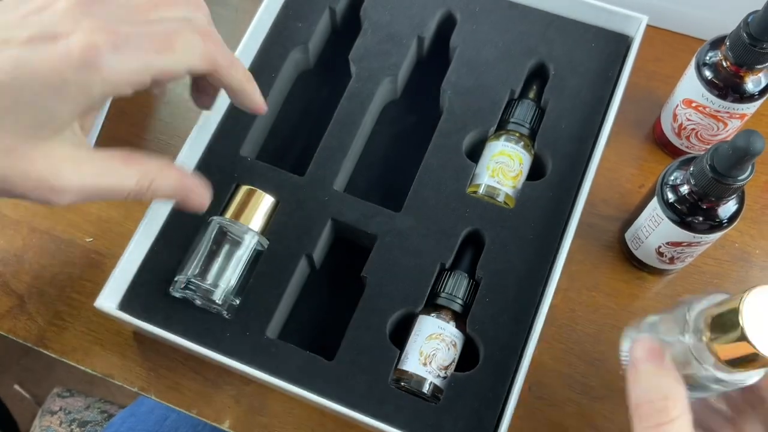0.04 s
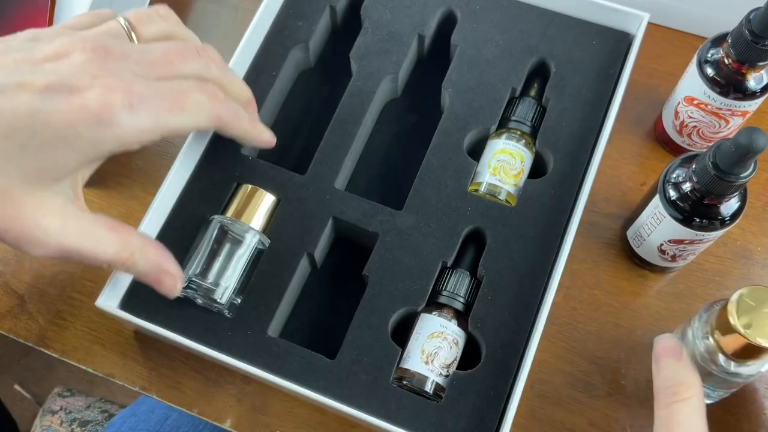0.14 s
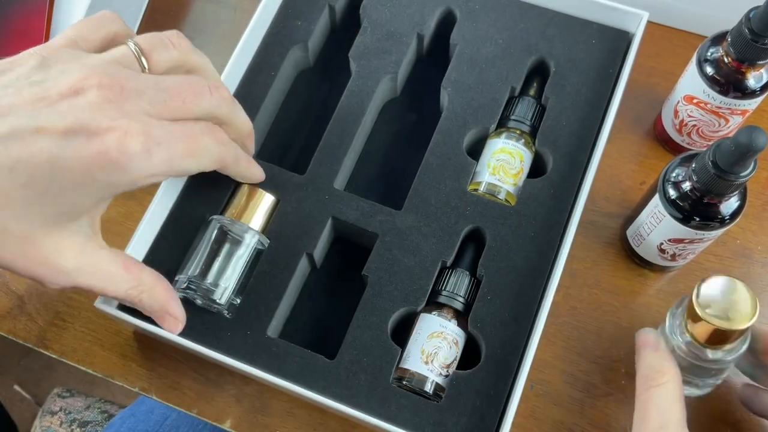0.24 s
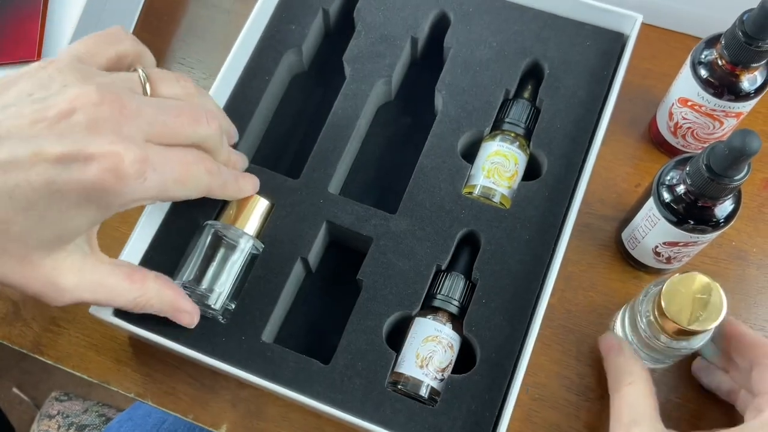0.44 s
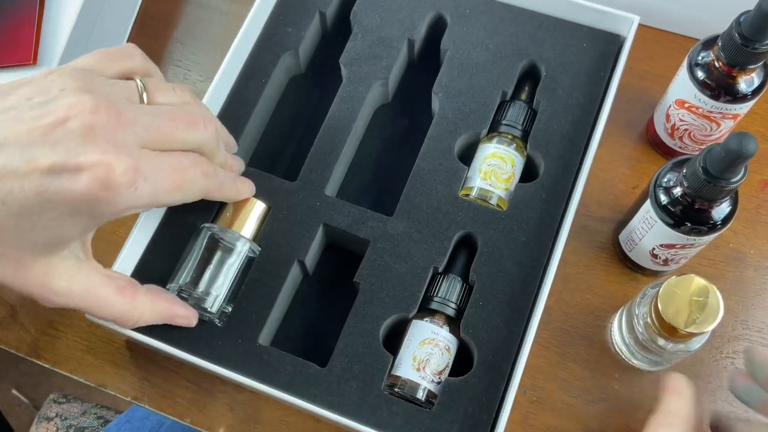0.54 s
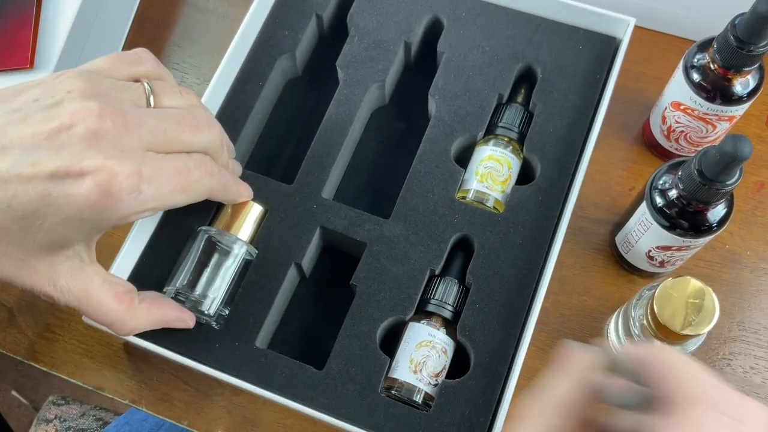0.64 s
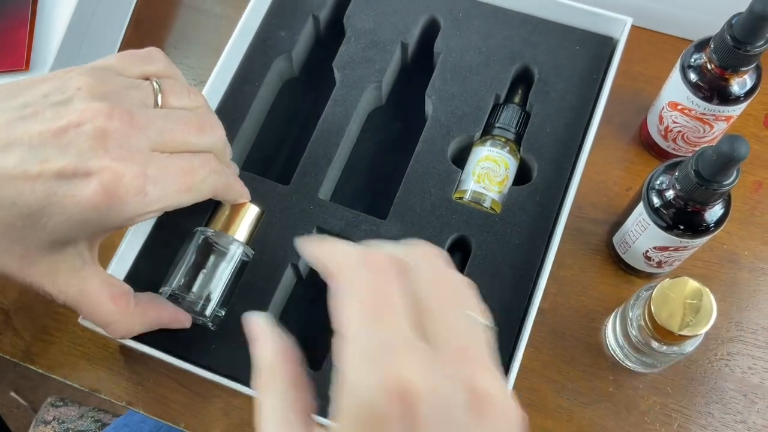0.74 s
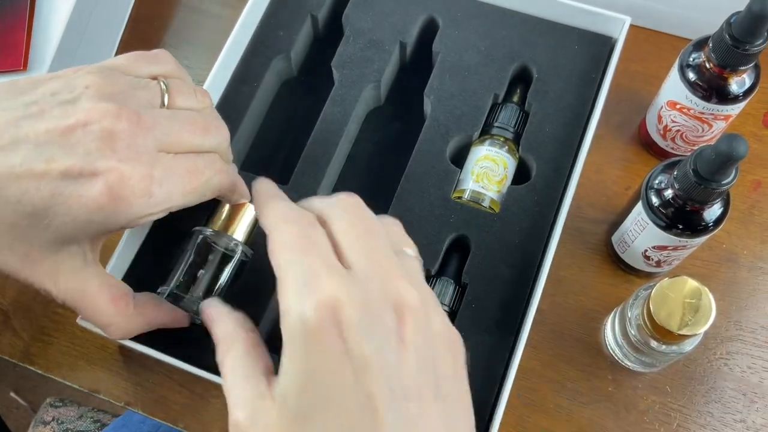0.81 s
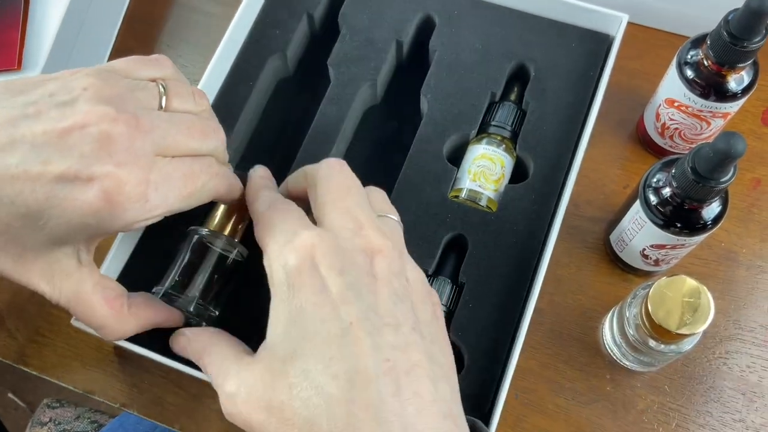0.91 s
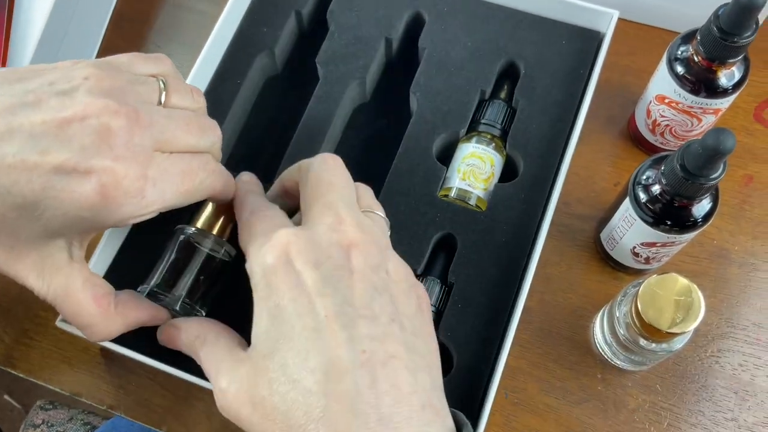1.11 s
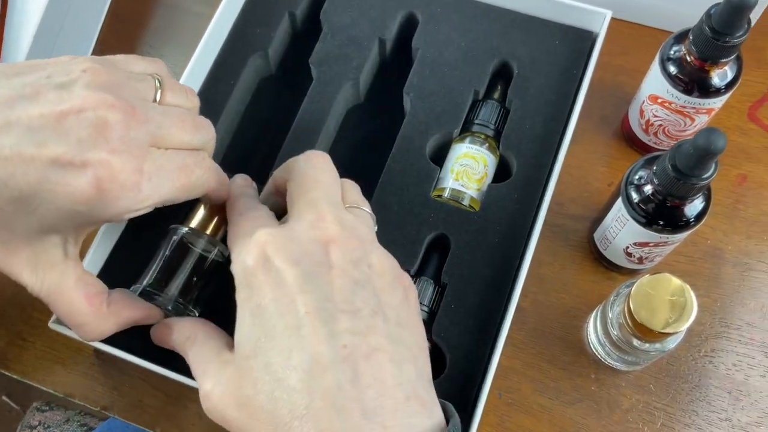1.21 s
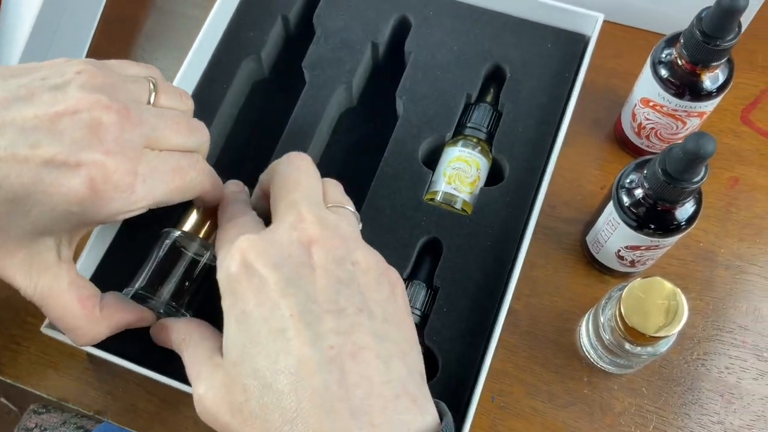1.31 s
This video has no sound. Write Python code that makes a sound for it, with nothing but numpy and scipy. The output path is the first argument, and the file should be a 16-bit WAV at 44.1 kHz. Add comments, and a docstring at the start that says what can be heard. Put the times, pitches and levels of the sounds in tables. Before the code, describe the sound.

A small glass bottle is stood on a wooden table: a faint tick at 0.15 s, a strong, woody knock at 0.23, then a flatter drop and tiny rocking at 0.35-0.38, with damped glass clicks and short room ring. Faint sliding follows until 0.55. From 0.85 to 1.25, quiet rubbing, foam friction and finger ticks, with a dull box bump near 1.12. Low room rumble, close stereo microphones.

```python
"""A quiet room: a small glass bottle is stood on a wooden table; one edge knocks down, then the base drops
flat and rocks. Filtered impulses ring table modes, dense wood, glass and the room.
The glass slides a little under the fingers; then the hands rub and tick against another bottle in its
foam tray, all made of shaped noise, with faint ringing of the box under the ticks.
A low room rumble of coloured noise lies underneath, heard by a close pair of microphones."""
import sys
import numpy as np
from scipy import signal
from scipy.fft import rfft, irfft
from scipy.io import wavfile

SR = 44100
rng = np.random.default_rng(int(sys.argv[2]) if len(sys.argv) > 2 else 0)


def put_to_file(sound):
    """Save the sound as 16-bit audio at rate SR, in the file named by the first command-line argument."""
    columns = np.atleast_2d(sound).T  # one column per channel
    safe = np.clip(columns, -1, 1)
    whole_steps = np.round(safe * 32767)
    wavfile.write(sys.argv[1], SR, whole_steps.astype(np.int16))


N = 59535
TIME = np.arange(N) / SR  # seconds
BINS = np.fft.rfftfreq(2 * N, 1 / SR)  # Hz, for spectra padded to twice the length
ROOM_T60_S, ROOM_RISE_S = 0.46, 0.0024


def from_db(db):
    """Decibels to gain."""
    return 10 ** (np.asarray(db) / 20)


def at_bins(points):
    """Spread a table over frequency, joined by straight lines on a log axis."""
    hz, value = np.transpose(points)
    return np.interp(np.log(BINS + 1), np.log(hz), value)


def noise(spectrum):
    """Coloured stereo noise of rms 1, its sides sharing as much as a close microphone pair would hear."""
    # Likeness of left and right. Each row: frequency in Hz, correlation (1 is identical).
    likeness = [(60, 1), (130, 0.99), (400, 0.36), (700, -0.02), (1000, 0.3), (1500, 0.7), (2400, 0.45),
                (3500, 0.8), (15000, 0.9)]
    mid, side = rfft(rng.standard_normal((2, 2 * N)))
    alike = np.clip(at_bins(likeness), 0, 1)
    pair = np.sqrt(1 + alike) * mid + np.sqrt(1 - alike) * side * [[1], [-1]]
    x = irfft(pair * from_db(at_bins(spectrum)))[:, :N]
    return x / x.std()


def tail(spectrum, t60, rise_s):
    """A dense response: coloured noise that swells and dies away, at unit energy."""
    decay = from_db(-60 * TIME / t60)
    swell = 1 - np.exp(-TIME / rise_s)
    x = noise(spectrum) * decay * swell
    return x / np.sqrt(np.sum(x ** 2) / 2)  # mean energy of the two sides


def through(x, response):
    """Play a mono signal through a mono or stereo response by convolution."""
    return signal.fftconvolve(x[None], np.atleast_2d(response), axes=1)[:, :N]


def ringing(modes, alternate=True):
    """Impulse response of a body: decaying sines, of alternating sign or all in step."""
    response = 0
    for k, (hz, db, t60) in enumerate(modes):
        sign = -1 if alternate and k % 2 else 1
        decay = from_db(db - 60 * TIME / t60)
        response = response + sign * decay * np.sin(2 * np.pi * hz * TIME)
    return response


def click(s, db):
    """One impulse, the shortest possible blow."""
    x = np.zeros(N)
    x[int(s * SR)] = from_db(db)
    return x


def cut(x, hz, kind, order):
    """Butterworth low- or high-pass."""
    sos = signal.butter(order, hz, kind, fs=SR, output="sos")
    return signal.sosfilt(sos, x + 1e-18)  # the tiny offset keeps the filter clear of denormal numbers


def friction(spectrum):
    """Rubbing noise, made grainy by tiny sticks and slips that wander its level."""
    grain_db, grains_per_s = 1, 340
    slips = np.interp(TIME * grains_per_s, np.arange(N), rng.standard_normal(N))
    return noise(spectrum) * from_db(grain_db * slips)


def strokes(rows, spectrum):
    """Friction under strokes that rise in a straight line, hold and let go exponentially."""
    attack_s, release_s = 0.0093, 0.013
    level = 0
    for s, length, db in rows:
        rise = np.clip((TIME - s) / attack_s, 0, 1)
        release = np.exp(-np.maximum(TIME - s - length, 0) / release_s)
        level = level + from_db(db) * rise * release
    return level * friction(spectrum)


def room_rumble():
    """Steady coloured noise, heaviest in the bass: the air of the room."""
    # Colour of the rumble. Each row: frequency in Hz, level in dB.
    floor = [(20, -31), (35, -18), (58, 2), (85, -1.5), (118, 2.5), (160, -9), (220, -6.5), (500, -14),
             (750, -20), (1300, -22.5), (2400, -33), (4900, -38), (6500, -48.5), (15000, -60.5)]
    return from_db(-52) * noise(floor)


def foam_push():
    """The second bottle is pushed in its foam pocket: friction as glass starts to slip, then settles."""
    # Pushes. Each row: start in seconds, level in dB, fade in dB per second.
    pushes = [(0.85, -48.5, 339), (1.215, -52.5, 66)]
    # Colour of glass on foam. Each row: frequency in Hz, level in dB.
    push_colour = [(300, -13), (900, -3), (1300, 1.5), (1800, 3.5), (2300, -7.5), (4500, -6), (7000, -7.5),
                   (10000, -19), (13000, -26), (16000, -40)]
    rise_s = 0.018
    level = 0
    for s, db, fade_db_per_s in pushes:
        age = np.maximum(TIME - s, 0)
        rise = np.minimum(age / rise_s, 1) ** 2
        level = level + rise * from_db(db - fade_db_per_s * age)
    return level * friction(push_colour)


def skin_rubs():
    """Skin rubs over glass and foam: bright grainy friction."""
    # Rubs. Each row: start in seconds, hold length in seconds, level in dB.
    rubs = [(.281, 0.022, -60.5), (.858, 0.019, -57.5), (.896, 0.03, -59), (.943, 0.025, -51.5),
            (.985, 0.043, -69.5), (1.125, 0.17, -70)]
    # Colour of the rubbing. Each row: frequency in Hz, level in dB.
    rub_colour = [(400, -20.5), (1000, -18), (2200, 0), (3500, 4), (5100, 6), (7000, 0), (10000, -6),
                  (12500, -12), (16000, -16.5)]
    return strokes(rubs, rub_colour)


def bottle_slides():
    """The bottle slides on wood and under the fingers: short grainy friction."""
    # Slides. Each row: start in seconds, hold length in seconds, level in dB.
    slides = [(.16, 0.018, -69), (.320, 0.027, -55.5), (.435, 0.039, -57), (.48, 0.086, -67),
              (.695, 0.051, -68.5), (.8, 0.025, -68.5)]
    # Colour of the sliding. Each row: frequency in Hz, level in dB.
    slide_colour = [(500, -9), (1500, -6), (2400, -1), (3700, 4.5), (5500, -4.5), (7500, -11), (10000, -22),
                    (12500, -38), (16000, -31)]
    return strokes(slides, slide_colour)


def finger_ticks():
    """Fingertips and nails tick on bottle and tray: decaying scuffs, a little room, a bump of box modes."""
    # Ticks. Each row: start in seconds, level in dB, t60 in seconds, low-pass in Hz,
    # dull blow to the box in dB.
    ticks = [(0.1525, -37, 0.021, 2590, -34), (.8570, -51, 0.03, 6000, -8), (.8750, -50, 0.035, 12000, -7),
             (0.948, -54, 0.03, 12000, -33), (0.9766, -38, 0.016, 4500, -14),
             (1.1161, -44.5, 0.053, 11900, 3.5), (1.164, -45, 0.026, 6940, -13)]
    # Colour of a scuff. Each row: frequency in Hz, level in dB.
    tick_colour = [(200, 3), (800, -1.5), (1600, 4.5), (2400, 1.5), (3500, 4), (5100, 4.5), (9000, -1.5),
                   (12000, -24), (16000, -16)]
    # Resonances of the box. Each row: frequency in Hz, level in dB, t60 in seconds.
    box_modes = [(59.5, -52, 0.9), (202.8, -56, 0.36), (335.5, -50, 0.16), (400, -51.5, 0.053)]
    rise_s, room_db = 0.0021, -18.5
    scuff = noise(tick_colour)
    dry, bumps = 0, 0
    for s, db, t60, bright_hz, bump_db in ticks:
        age = np.maximum(TIME - s, 0)
        level = from_db(db - 60 * age / t60) * np.minimum(age / rise_s, 1)
        dry = dry + cut(level * scuff, bright_hz, "low", order=2)
        bumps = bumps + click(s, bump_db)
    room = from_db(room_db) * through(dry[0], tail(tick_colour, ROOM_T60_S, ROOM_RISE_S))
    return dry + room + through(bumps, ringing(box_modes))


def bending(x):
    """Deep bending waves travel slowest, so crossing the table top spreads a blow into a falling chirp."""
    travel_s, together_hz = 0.00356, 1722  # travel time at 1 kHz; all pitches above together_hz arrive at once
    slowness = np.sqrt(1000 / np.maximum(BINS, 30))
    delay = travel_s * np.maximum(slowness - np.sqrt(1000 / together_hz), 0)  # behind the treble
    phase = 2 * np.pi * np.cumsum(delay) * BINS[1]  # summing group delay over frequency gives phase
    return irfft(rfft(x, 2 * N) * np.exp(-1j * phase))[:N]


def table_top(force, spot):
    """The first wave passes, then standing waves build up, each as strongly as the struck spot allows."""
    # First bending wave to cross the table top. Each row: frequency in Hz, level in dB.
    wave = [(30, -8), (75, 17.5), (300, 17), (550, 19.5), (800, 26.5), (1170, 16), (1500, 25.5),
            (1950, 8.5), (2800, -1), (8000, -43.5)]
    # Modes of the table top. Each row: frequency in Hz, level in dB struck under the edge,
    # level in dB struck under the base, t60 in seconds.
    table_modes = [(289.4, -30, -25, 0.19), (315.3, -32.5, -17, 0.078), (340.5, -22, -18, 0.12),
                   (474, -27.5, -25, 0.064), (539.5, -32, -31.5, 0.19), (636.6, -26, -24, 0.12),
                   (712, -26, -27, 0.18), (819.4, -23, -41, 0.11), (916, -25.5, -20, 0.098),
                   (1081, -18.5, -32.5, .075), (1240, -24, -25, .1), (1515, -28, -32, 0.039),
                   (1633, -17.5, -18, 0.048), (1686, -41, -33, 0.047), (1855, -44, -33, 0.076)]
    build_s = 0.0036  # standing waves form as the edges send the blow back
    first = irfft(rfft(force, 2 * N) * from_db(at_bins(wave)))[:N]
    modes = [(hz, base_db if spot > .5 else edge_db, t60) for hz, edge_db, base_db, t60 in table_modes]
    standing = ringing(modes, alternate=False) * (1 - np.exp(-TIME / build_s))
    return first + through(force, standing)


def bottle_on_table():
    """Each contact drives the table's modes, the dense wood and the room, and clicks in the glass."""
    # Glass meets table. Each row: start in seconds, level in dB, low-pass (contact brightness) in Hz,
    # bass cut in Hz, glass click in dB, spot (0 under the edge, 1 under the base).
    knocks = [(0.2329, 1, 1900, 70, 1.5, 0), (0.2411, -16.5, 1233, 151, -21, 0),
              (.3530, -17, 600, 283, -33.5, 1), (0.3647, -2.5, 3600, 450, -7.5, 1),
              (0.3739, -4, 400, 330, -36, 1), (0.38, -9.5, 1300, 336, -27, 1)]
    # Hand-damped bottle and cap. Each row: frequency in Hz, level in dB, t60 in seconds.
    glass_modes = [(2883, -33.5, 0.036), (3290, -29, 0.012), (4030, -31.5, 0.0084), (5110, -33, 0.014),
                   (5600, -38, 0.014), (8090, -41.5, 0.0084)]
    # Dense ringing of the wood and first reflections. Each row: frequency in Hz, level in dB.
    wood_colour = [(80, 0), (200, -19.5), (330, 1.5), (700, -1.5), (1100, 1.5), (1600, -5.5), (2100, -13),
                   (3500, -23.5), (7000, -34), (15000, -58)]
    # Colour of the room tail. Each row: frequency in Hz, level in dB.
    room_colour = [(80, -17), (250, -1), (450, -4), (650, 2.5), (900, -7.5), (1250, -6), (1700, -14.5),
                   (2300, -24.5), (4000, -29.5), (8000, -35), (15000, -64)]
    # Standing waves that linger in the room. Each row: frequency in Hz, level in dB, t60 in seconds.
    room_modes = [(447, -57.5, 0.59), (572, -45, .5), (602.3, -41, 0.46), (631, -52, 0.37),
                  (706, -42.5, 0.45), (739, -43.5, 0.35), (852, -53, 0.37), (1114, -48, 0.19),
                  (1257, -48.5, 0.63)]
    wood_db, wood_t60_s, wood_rise_s = 7.5, 0.076, 0.0029
    room_db = 3
    glass = ringing(glass_modes)
    room = from_db(room_db) * tail(room_colour, ROOM_T60_S, ROOM_RISE_S)
    room = room + ringing(room_modes, alternate=False)
    out = 0
    for s, db, bright_hz, bass_hz, glass_db, spot in knocks:
        blow = cut(click(s, db), bright_hz, "low", order=1)
        force = bending(cut(blow, bass_hz, "high", order=1))
        wood = from_db(wood_db) * tail(wood_colour, wood_t60_s, wood_rise_s)  # drawn anew for each contact
        out = out + table_top(force, spot) + through(force, wood + room)
        out = out + through(click(s, glass_db), glass)
    return out


def scene():
    """The room's rumble, handling noises and knocks, summed."""
    handling = foam_push() + skin_rubs() + bottle_slides() + finger_ticks()
    return room_rumble() + handling + bottle_on_table()


def record(dry):
    """The two microphones differ in phase and level over frequency; a steep low-pass cuts the top."""
    # Phase between the microphones. Each row: frequency in Hz, lead of the left in radians.
    port_phase = [(20, 0), (200, .1), (480, .5), (900, -.1), (1450, -.2), (2000, -1.9), (2500, -3.2),
                  (3200, -5.5), (4000, -6.4), (6200, -7.2), (8000, -8.2), (9100, -9.4), (10400, -9.5),
                  (13000, -12.5)]
    # Balance of the microphones. Each row: frequency in Hz, left minus right in dB.
    port_balance = [(130, -0.5), (330, 0.5), (630, 7.5), (950, 1.5), (1600, 1), (3000, -0.5)]
    cutoff_hz = 15800
    sides = np.array([[.5], [-.5]])  # each side takes half the difference
    ports = from_db(sides * at_bins(port_balance)) * np.exp(1j * sides * at_bins(port_phase))
    heard = irfft(rfft(dry, 2 * N) * ports)[:, :N]
    return signal.sosfilt(signal.ellip(12, .1, 80, cutoff_hz, fs=SR, output="sos"), heard)


dry = scene()
out = record(dry)
put_to_file(out)
```